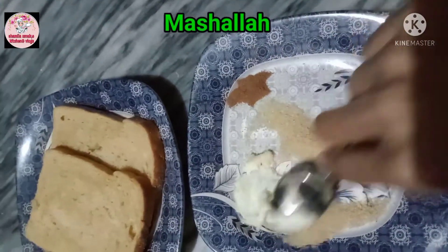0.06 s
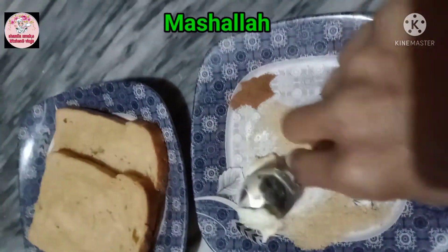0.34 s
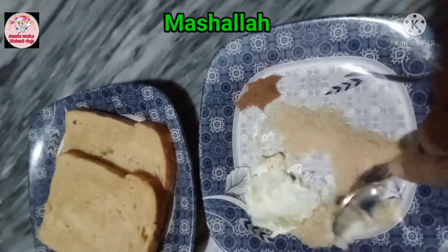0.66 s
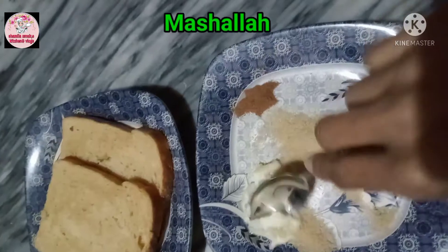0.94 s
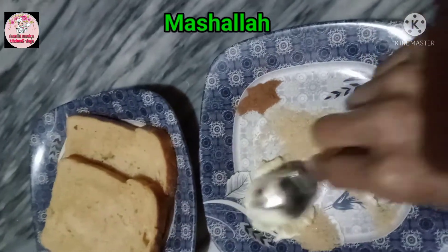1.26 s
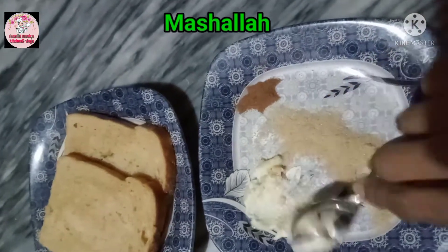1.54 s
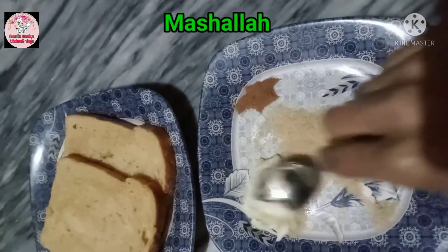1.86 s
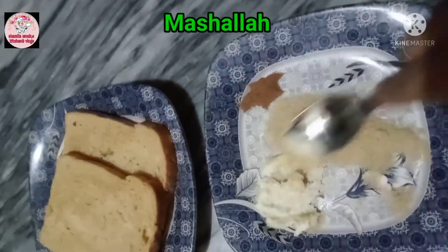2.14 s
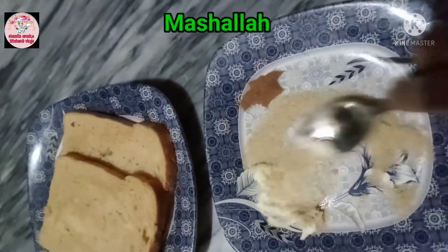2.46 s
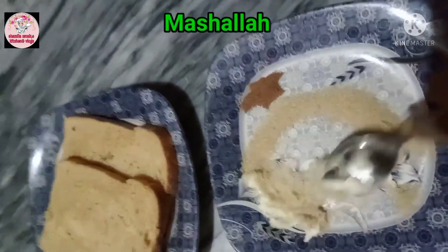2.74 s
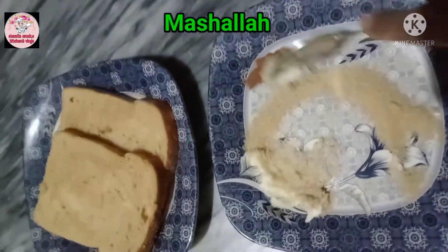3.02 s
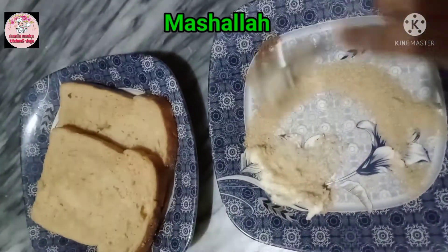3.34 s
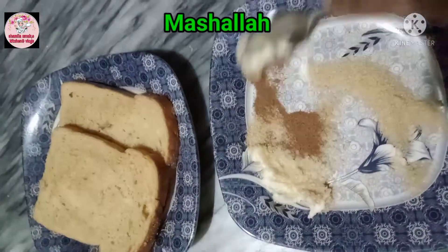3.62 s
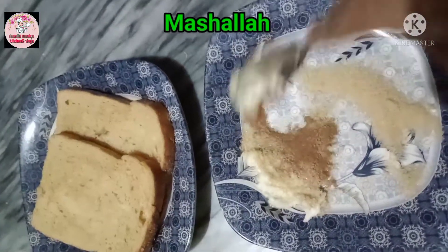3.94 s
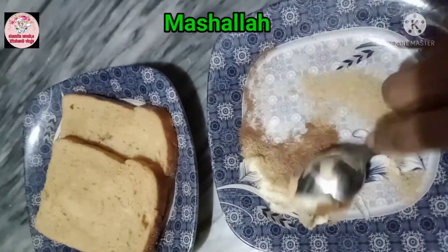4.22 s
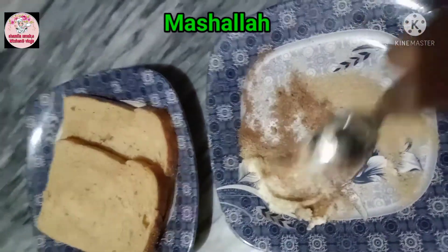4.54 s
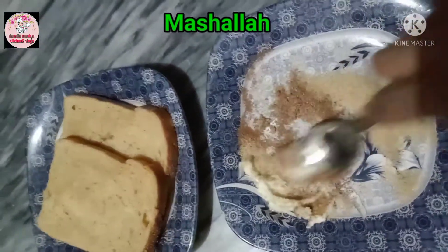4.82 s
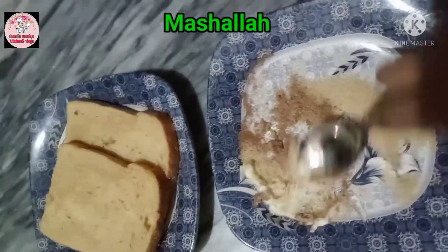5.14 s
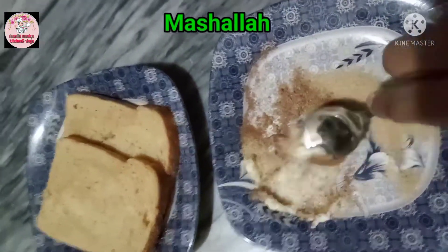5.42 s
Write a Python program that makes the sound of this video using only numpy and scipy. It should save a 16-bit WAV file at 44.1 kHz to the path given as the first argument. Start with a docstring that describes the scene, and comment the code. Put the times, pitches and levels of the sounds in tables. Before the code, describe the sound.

A steel spoon clicks against a ceramic plate and drags sugar across it in short, gritty strokes. One hard knock makes the plate ring briefly. More scraping follows with a slight squeak, then a sharp clink, and the spoon settles into an even, soft mashing rhythm. It is heard up close in a small kitchen, over faint hiss and a low hum.

```python
"""A steel spoon mashes butter, sugar and powder on a ceramic plate in a small kitchen.
Faint hiss and low hum throughout. From 0.1 s the spoon lands, rebounds as the hand's weight settles,
and drags sugar across the glaze; hand and paste damp most blows. At 1.6 s a hard one lets the plate ring.
Near 2.4 and 2.7 s a gliding touch leaves one mode singing. A sharp clink falls at 4 s;
from 4.3 s the spoon mashes in an even dab-and-press rhythm."""
import sys
import numpy as np
from scipy import signal
from scipy.fft import rfft, irfft
from scipy.io import wavfile
from scipy.ndimage import uniform_filter1d, minimum_filter1d

SR = 44100
rng = np.random.default_rng(int(sys.argv[2]) if len(sys.argv) > 2 else 0)


def to_wav(s):
    """Save 16-bit WAV."""
    ch = np.atleast_2d(s).T  # columns
    pcm = np.round(np.clip(ch, -1, 1) * 32767)  # PCM
    wavfile.write(sys.argv[1], SR, pcm.astype(np.int16))


N = 246420
TIME_S = np.arange(N) / SR

# low modes, moving with the contact point: (frequency ratio [-], width [Hz], level [dB])
THUD_MODES = [(.3, 119.8, -7), (1, 169.6, -3)]
KNOCK_MODES = [(.68, 200, -10), (.87, 120, -2.5), (1, 110, 0.5), (1.17, 150, -8)]
# higher plate and spoon modes, contact-damped: (frequency [Hz], width [Hz], level [dB])
CLACK_MODES = [(1780, 320, -4), (1994, 78, 5), (2146, 367, -1), (2404, 210, 1)]
CLINK_MODES = [(2701, 100, 2), (2901, 150, 1.2), (3123, 150, -0.38)]
CHINK_MODES = [(3330, 62, -5), (3783, 126, 2), (4034, 160, -1.5), (4513, 360, -12)]
TICK_MODES = [(5520, 500, -7), (6450, 2100, -11.5), (8020, 720, -9), (9103, 400, 1), (9795, 600, -1),
              (10740, 800, -7.5), (12100, 990, -12.5), (13800, 700, -11.5)]


def from_db(db):
    """Decibels to gain."""
    return 10 ** (np.asarray(db) / 20)


def unit_rms(x):
    """Scale to rms 1."""
    return x / np.sqrt(np.mean(x ** 2) + 1e-20)


def in_time(curve):
    """Curve value at every sample."""
    return np.interp(TIME_S, *np.transpose(curve))


def at_hz(rows, hz):
    """Spectrum columns, interpolated over log frequency."""
    points_hz, *columns = np.transpose(rows)
    return [np.interp(np.log(np.maximum(hz, 1)), np.log(points_hz), c) for c in columns]


def drift(rate_hz):
    """Random wander, rms 1."""
    count = int(TIME_S[-1] * rate_hz) + 2
    return unit_rms(np.interp(TIME_S * rate_hz, np.arange(count), rng.standard_normal(N)[:count]))


def add(track, start_s, sound):
    """Mix a sound in at start_s."""
    at = int(start_s * SR)
    track[at:at + len(sound)] += sound[:N - at]


def pitched(modes, hz):
    """Mode ratios to frequencies."""
    return [(ratio * hz, width_hz, db) for ratio, width_hz, db in modes]


def resonate(force, modes):
    """Parallel resonances; a family radiates little outside its range."""
    out = 0
    for k, (hz, width_hz, db) in enumerate(modes):
        r = np.exp(-np.pi * width_hz / SR)
        feedback = [1, -2 * r * np.cos(2 * np.pi * hz / SR), r * r]
        mode = signal.lfilter([(1 - r * r) / 2, 0, (r * r - 1) / 2], feedback, force)
        out = out + (-1) ** k * from_db(db) * mode
    edges_hz = [modes[0][0] * 0.73, min(modes[-1][0] * 1.9, SR * .45)]
    return signal.sosfilt(signal.butter(2, edges_hz, "band", fs=SR, output="sos"), out)


def background_hiss():
    """Soft noise with a hollow ring near 2 kHz."""
    # spectrum: (frequency [Hz], relative density [dB])
    colour = [(30, -20), (65, -3), (125, 6), (220, -4.5), (380, -2.5), (750, -11), (1400, -15),
              (1850, -20.5), (2200, -9), (2650, -18.5), (3700, -13.5), (5500, -32), (8000, -38.5),
              (9500, -23.5), (12000, -36), (16000, -43)]
    # hollow ring: (frequency [Hz], width [Hz], level [dB])
    hollow_modes = [(2120, 80, -2.5), (2180, 24, -2), (2310, 60, -3), (2450, 50, -5.5)]
    # hiss envelope: (time [s], level [dB])
    envelope = [(0, -48.5), (.6, -50), (1, -57), (2.9, -57.5), (3.1, -55.5), (3.8, -55), (4.2, -58),
                (5.59, -54)]
    colour_db, = at_hz(colour, np.arange(N // 2 + 1) * SR / N)
    hiss = unit_rms(irfft(rfft(rng.standard_normal(N)) * from_db(colour_db), N))
    hollow = unit_rms(resonate(rng.standard_normal(N), hollow_modes))
    return from_db(in_time(envelope)) * (hiss + from_db(-3) * hollow)


def appliance_hum(hz=79.5, gain_db=4.0):
    """Low tone, wavering in level and phase."""
    # hum envelope: (time [s], relative level [dB])
    envelope = [(0, -56.5), (1, -76), (1.7, -67.5), (3.3, -68), (3.7, -54), (4.3, -71), (5.1, -55),
                (5.59, -67.5)]
    level_db = in_time(envelope) + gain_db + 0.76 * drift(20)
    return from_db(level_db) * np.sin(2 * np.pi * hz * TIME_S + .5 * drift(7.4))


def kitchen_reverb(direct):
    """Dense reflections from near walls, dying band by band."""
    # reverberation: (frequency [Hz], t60 [s], level re direct [dB])
    room = [(150, 0.29, -11), (930, 0.32, -8.5), (2820, 0.45, -19), (6000, 0.36, -17), (10000, 0.15, -19.5),
            (15000, 0.71, -18)]
    t, response = TIME_S[:SR * 3 // 4], 0
    edges_hz = np.geomspace(70, 17000, 9)
    for low, high in zip(edges_hz, edges_hz[1:]):
        t60_s, db = at_hz(room, np.sqrt(low * high))
        decay = from_db(-60 * t / t60_s) * np.clip((t - .003) / 0.002, 0, 1)
        tail = rng.standard_normal(len(t)) * decay / np.linalg.norm(decay)
        band = signal.butter(2, [low, high], "band", fs=SR, output="sos")
        response = response + from_db(db) * signal.sosfilt(band, tail)
    return signal.fftconvolve(direct, response)[:N]


def grains(per_s, spread_db):
    """Tiny slips or cracking crystals: random clicks of unequal size."""
    sizes = from_db(spread_db * np.minimum(rng.exponential(1, N), 4.5)) * rng.choice([-1, 1], N)
    return sizes * (rng.random(N) < per_s / SR) + 1e-18


def stroke_levels_db():
    """Friction, plate body and grit: each stroke climbs, leans harder, then dies as the spoon lifts."""
    # drags on the glaze: (time [s], attack [s], hold [s], friction [dB], swell over hold [dB],
    # body offset [dB], grit offset [dB])
    drags = [(0.091, 0.015, .14, -42, -1.5, -2.5, -2), (0.37, 0.29, 0.23, -55.5, 8, -2, -1.5),
             (0.711, 0.021, 0.13, -34, -3, -2.5, -7), (1.07, 0.24, 0.072, -48.5, 9.5, -4, -3.5),
             (1.389, 0.1, 0.052, -47, 8, 2.5, -6.5), (1.976, 0.068, 0.06, -31.5, -3.5, -10.5, -13.5),
             (2.139, 0.011, 0.16, -38, -8, -7.5, -9), (2.4, 0.17, 0.19, -39, 6, -3, -4.5),
             (2.65, .05, 0.056, -49.5, -2, -17, -4.5), (2.778, 0.007, 0.0095, -36, -8, -10, -7),
             (3.351, 0.075, 0.11, -45.5, -1, -4, -9.5), (3.635, 0.016, 0.053, -46.5, 1.5, -7, -9.5),
             (3.755, 0.046, 0.017, -45, -3.5, -13, -6), (4.0, 0.025, 0.071, -51, -5, 7.5, 2)]
    # light dab into the paste: one drag row without its time
    dab = (0.01, -0.02, -45, -3, -26, -4)
    # dab, then press: (dab time [s], press hold [s], press friction [dB])
    mashes = [(4.263, 0.036, -43.5), (4.52, 0.052, -39.5), (4.785, 0.066, -42.5), (5.091, 0.054, -44.5),
              (5.345, 0.067, -46.5)]
    press_delay_s, attack_db, lean_db = 0.062, 29.5, 7
    friction_db_per_s, body_db_per_s, grit_db_per_s = 330, 290, 310
    dabs = [(s, *dab) for s, _, _ in mashes]
    presses = [(s + press_delay_s, 0.054, hold_s, db, 2.5, -5.5, -7.5) for s, hold_s, db in mashes]
    friction = body = grit = -np.inf
    for s, attack_s, hold_s, db, swell_db, body_db, grit_db in drags + dabs + presses:
        progress = np.clip((TIME_S - s) / hold_s, 0, 1) - .5
        level_db = db + swell_db * progress - attack_db * np.maximum(s - TIME_S, 0) / attack_s
        lifted_s = np.maximum(TIME_S - s - hold_s, 0)
        friction = np.maximum(friction, level_db - friction_db_per_s * lifted_s)
        body = np.maximum(body, level_db + body_db + lean_db * progress - body_db_per_s * lifted_s)
        grit = np.maximum(grit, level_db + grit_db - grit_db_per_s * lifted_s)
    return friction, body, grit


def spoon_scrape():
    """Stick-slip shakes the plate and spoon modes; sugar cracks under the spoon."""
    # paste on the spoon dulls the scrape: (time [s], chink re friction [dB])
    coating = [(0, 1.5), (.8, -6), (2, -8.5), (2.3, -4.5), (2.7, -9.5), (3.6, -14.5), (4.3, -4.5),
               (4.9, -9), (5.5, -6)]
    # one plate mode under a gliding touch: (time [s], level re friction [dB])
    singing = [(2.15, -13), (2.36, -3), (2.5, -15), (2.69, 8), (2.8, -11)]
    friction_db, body_db, grit_db = stroke_levels_db()
    slips = grains(per_s=6000, spread_db=1.5) * from_db(1.5 * drift(90))
    sugar = from_db(3.0) * grains(per_s=120, spread_db=3.5)
    families = ((pitched(THUD_MODES, hz=368.0), body_db - 16.5),
                (pitched(KNOCK_MODES, hz=941), body_db - 7),
                (CLACK_MODES, (friction_db + body_db) / 2 - 5),
                (CLINK_MODES, friction_db - 3),
                (CHINK_MODES, friction_db + in_time(coating)),
                ([(2843, 20, 0)], friction_db + in_time(singing)))
    plate = sum(from_db(db) * unit_rms(resonate(slips, modes)) for modes, db in families)
    return plate + from_db(grit_db - 0.6) * unit_rms(resonate(slips + sugar, TICK_MODES))


def plate_ring(start_s=1.607, blow_db=-28):
    """The spoon leaves at once after the hardest blow; the plate rings freely."""
    # free plate modes: (frequency [Hz], level re blow [dB], t60 [s])
    free_modes = [(1053, -3.5, 0.5), (1095, -4.5, 0.42), (1600, -19.5, 0.7), (1860, -19.5, .4),
                  (2220, -15, .4), (2390, -10, 0.41), (2675, -4.5, .3), (2810, -5, .55), (3460, -16.5, .4),
                  (3951, -13, 0.64), (5464, -21.5, 0.48)]
    out, t = np.zeros(N), TIME_S[:SR]
    for hz, db, t60_s in free_modes:
        decay = from_db(blow_db + db - 60 * t / t60_s)
        add(out, start_s, rng.choice([-1, 1]) * decay * np.sin(2 * np.pi * hz * t))
    return out


def contact_force(chatter_ms, bounce, size=4096):
    """One touch, then a dying buzz of tiny rebounds; shorter is brighter."""
    chatter_ms = max(chatter_ms, .5)
    t_ms = np.arange(size) / SR * 1000
    chatter = rng.standard_normal(size) * from_db(5.18 * rng.standard_normal(size))
    chatter *= np.exp(-t_ms / chatter_ms)
    force = bounce * chatter / np.linalg.norm(chatter)
    force[0] += 1
    top_hz = min(9500 + 11000 / chatter_ms ** 2, SR * .45)
    return signal.sosfilt(signal.butter(4, top_hz, fs=SR, output="sos"), force + 1e-18)


def spoon_hits():
    """The landing spot sets the mix of modes; rebounds gain thud and knock as the hand settles."""
    # landings: (time [s], clink [dB], chatter [ms], thud, knock, clack, chink, tick [dB re clink],
    # thud [Hz], knock [Hz])
    landings = [(0.0981, -33, 4.9, -7.5, -4, -3, 10, -1.5, 544, 794),
                (0.2004, -27, 6.8, -29, -15, 1, -5, -10, 303, 956),
                (0.5342, -31.5, 5.1, -33, 6, -2, -8, -20.5, 517, 894),
                (0.7136, -23.5, 9, -20, -14.5, -10.5, -1.5, -7.5, 290, 1000),
                (1.1155, -23.5, 1.4, -31.5, -14.5, -3.5, -5.5, -9.5, 340, 863),
                (1.301, -54.5, 0.89, -1, -4, -14, -2, 6.5, 325, 744),
                (1.408, -38, 2.3, -13, -20, -9, -10, -11, 286, 880),
                (1.4305, -30.5, 11, -22.5, -5, -2, -3.5, -11, 450, 890),
                (1.606, -6.5, 4.6, -18.5, -10, -1.5, -4.5, -6.5, 307, 1053),
                (1.967, -37, 4.8, -32, -17, -5.5, 3, -4.5, 266, 840),
                (2.468, -37, 2.6, -40, -8.5, -8, -4.5, -16, 500, 960),
                (2.505, -36, 3.4, -18, 12, 5, -5, -17, 550, 980),
                (2.5226, -24.5, 5.7, -18.5, 2, -1.5, -4, -19.5, 533, 961),
                (2.784, -29.5, 8.8, -24.5, -10.5, -4.5, -9, -11, 306, 956),
                (3.355, -36, 7.4, -4.5, -6, -15, -18, -18, 438, 820),
                (3.631, -35, 7.1, -0.5, -7.5, -22.5, -13.5, -14.5, 287, 801),
                (3.987, -12.5, 1.08, -18.5, -21, -17, -8, -8, 420, 815),
                (4.621, -38, 2.5, -13, 6.5, 3.5, -11, -10, 487, 876),
                (4.785, -38, 3.8, -21, -23, -31, -17, -20, 290, 730)]
    # further touches on the last landing spot: (time [s], clink [dB], chatter [ms])
    rebounds = [(0.207, -25.5, 9.4), (0.2186, -23.5, 4), (0.718, -15.5, 3.3), (0.7267, -22.5, 6),
                (1.1204, -27, 6.1), (1.133, -24.5, 8.5), (1.1403, -27, 4.1), (1.157, -34.5, 1.9),
                (1.437, -28, 5.3), (1.611, -14.5, 2.2), (1.975, -40.5, 0.61), (1.984, -31.5, 4.4),
                (2.479, -30, 11), (2.517, -43, 2.7), (2.5415, -38, 1.3), (2.556, -42.5, 1.2),
                (3.369, -41, 16), (3.397, -45.5, 8), (3.642, -42, 13), (3.991, -18, 6.4)]
    settle_s, settle_db = .014, 9
    hit_norm = np.sqrt(.01 * SR)  # 0 dB: energy of 10 ms at rms 1
    out = np.zeros(N)
    for s, clink_db, chatter_ms in [row[:3] for row in landings] + rebounds:
        landing = max(row for row in landings if row[0] <= s)
        landed_s, _, _, thud_db, knock_db, clack_db, chink_db, tick_db, thud_hz, knock_hz = landing
        weight_db = settle_db * min((s - landed_s) / settle_s, 1)
        force = contact_force(chatter_ms, bounce=1.9)
        families = ((pitched(THUD_MODES, thud_hz), thud_db + weight_db),
                    (pitched(KNOCK_MODES, knock_hz), knock_db + weight_db),
                    (CLACK_MODES, clack_db), (CLINK_MODES, 0),
                    (CHINK_MODES, chink_db), (TICK_MODES, tick_db))
        for modes, family_db in families:
            # the spoon's load shifts each mode from blow to blow
            loaded = [(hz * (1 + 0.016 * rng.standard_normal()), width_hz, db + 2 * rng.standard_normal())
                      for hz, width_hz, db in modes]
            sound = resonate(force, loaded)
            add(out, s, from_db(clink_db + family_db) * hit_norm * sound / np.linalg.norm(sound))
    return out


def scene():
    """Spoon and plate close by, the kitchen around them."""
    spoon = spoon_hits() + plate_ring() + spoon_scrape()
    return (spoon + kitchen_reverb(spoon) + background_hiss() + appliance_hum())[None]


def record(dry):
    """Fast limiter just under full scale, then a steep low-pass."""
    ceiling, window_samples, cutoff_hz = .93, SR // 500, 15800
    needed_gain = ceiling / np.maximum(np.abs(dry), ceiling)
    gain = uniform_filter1d(minimum_filter1d(needed_gain, window_samples), window_samples)
    return signal.sosfilt(signal.ellip(10, .1, 80, cutoff_hz, fs=SR, output="sos"), dry * gain)


dry = scene()
out = record(dry)
to_wav(out)
```